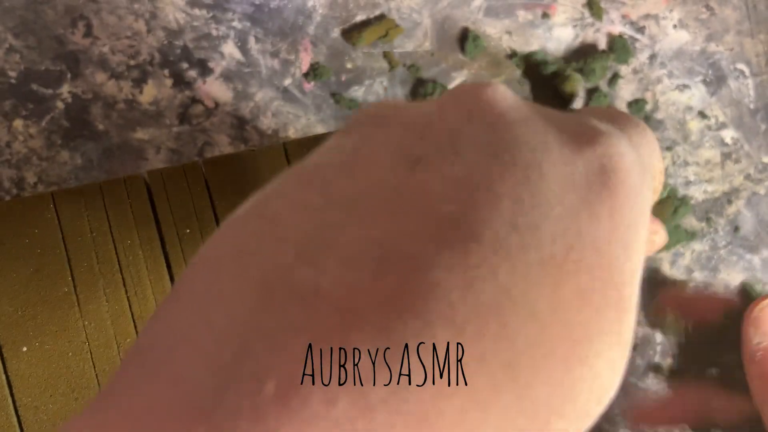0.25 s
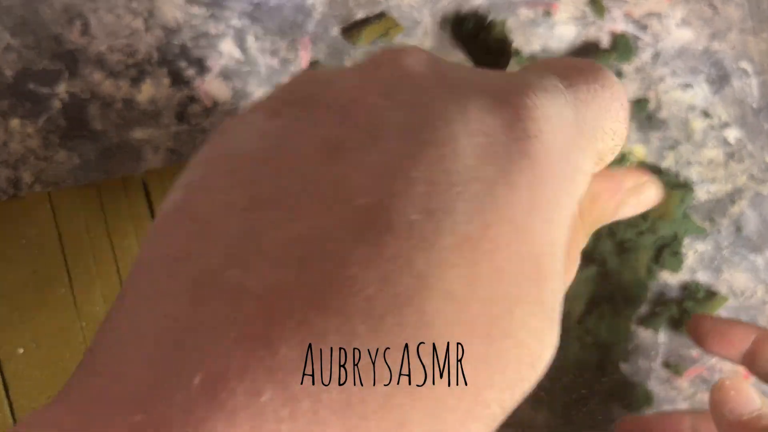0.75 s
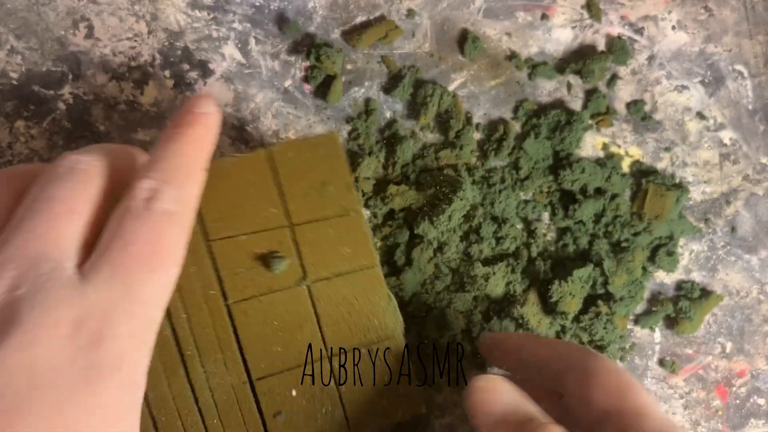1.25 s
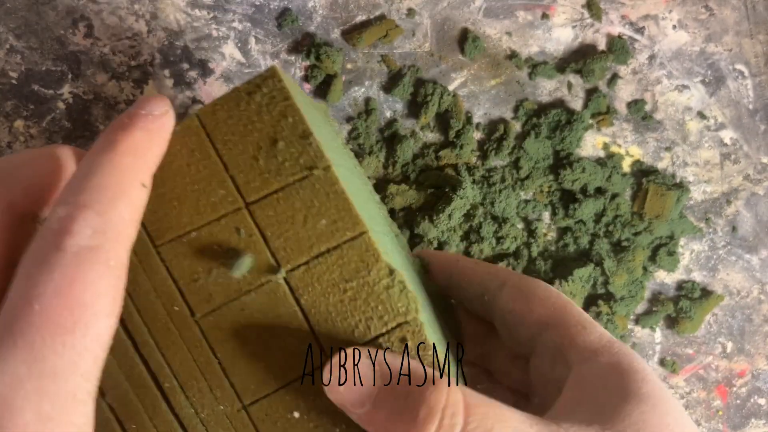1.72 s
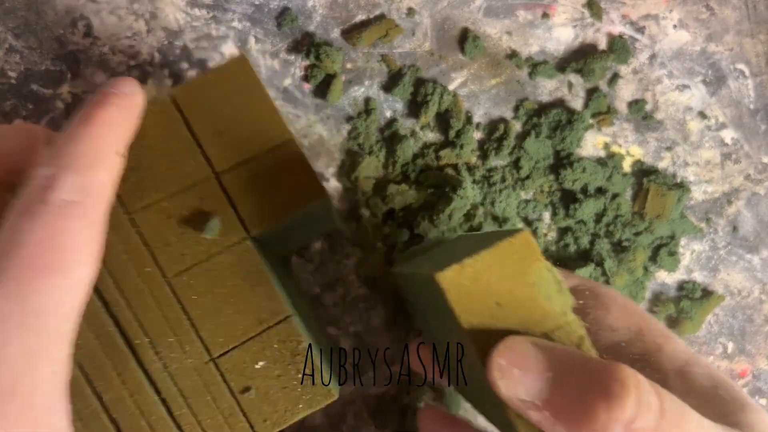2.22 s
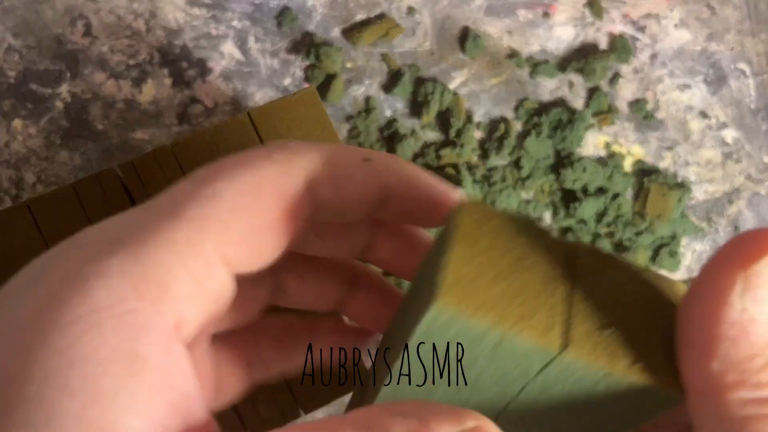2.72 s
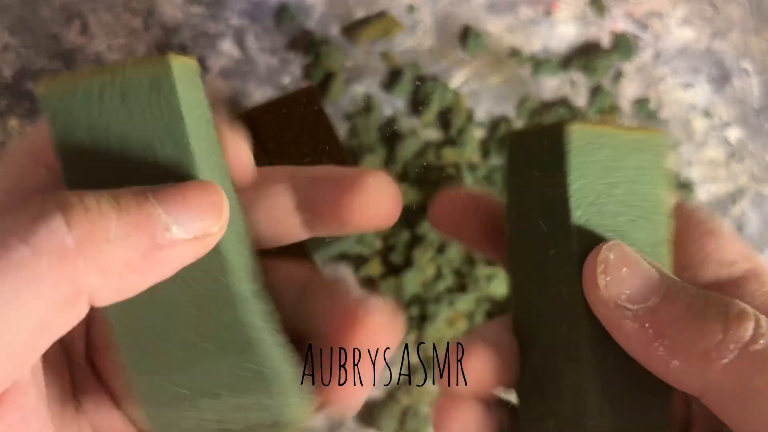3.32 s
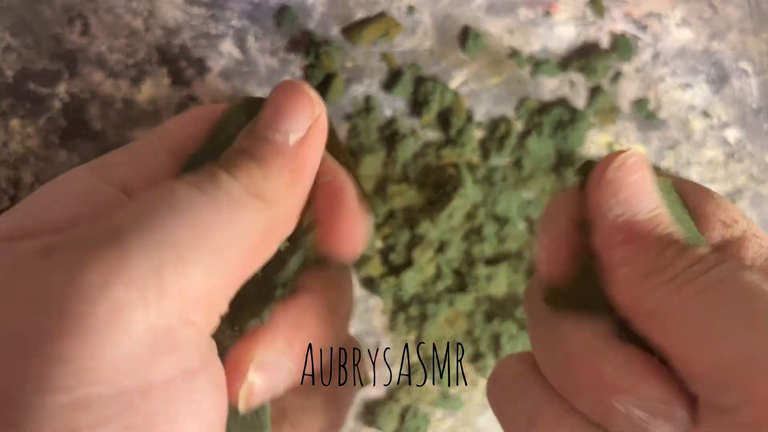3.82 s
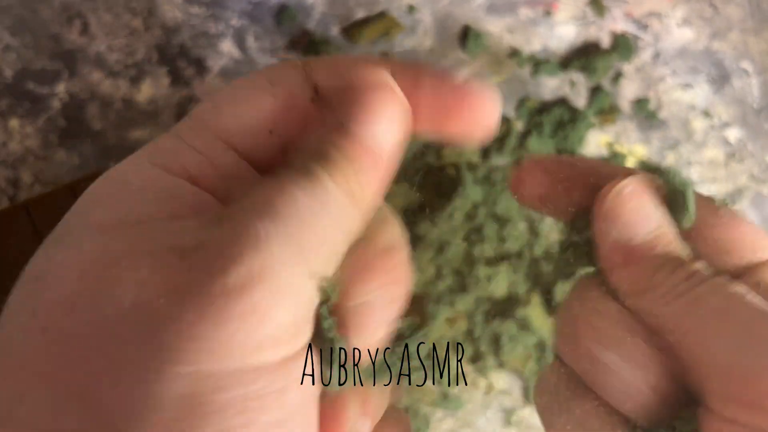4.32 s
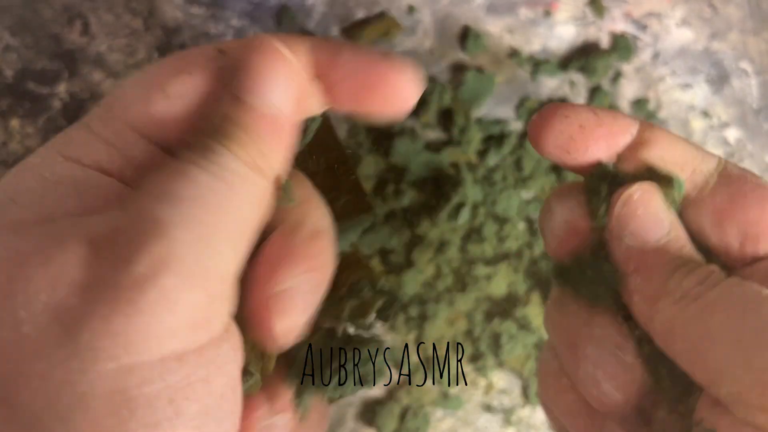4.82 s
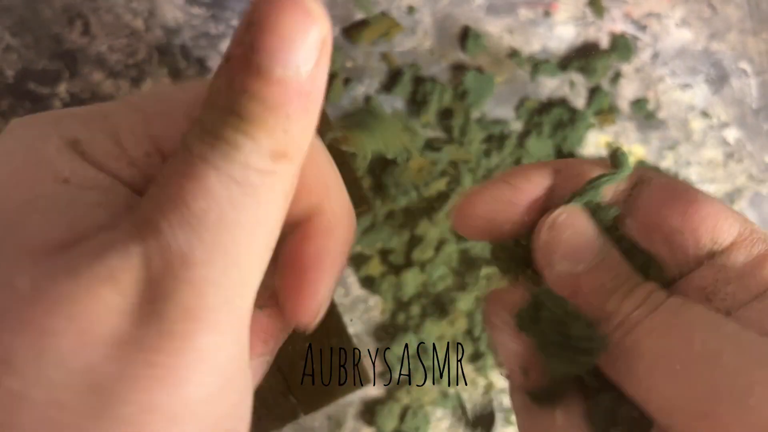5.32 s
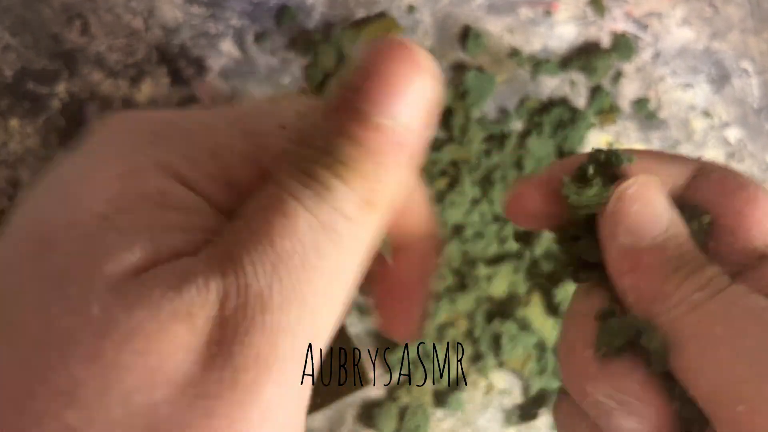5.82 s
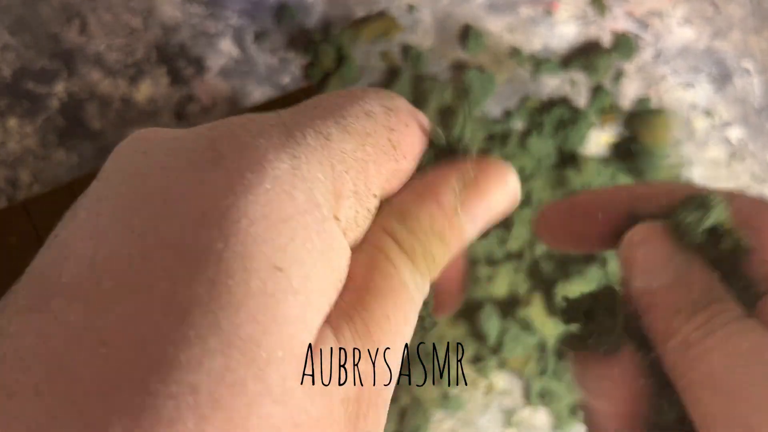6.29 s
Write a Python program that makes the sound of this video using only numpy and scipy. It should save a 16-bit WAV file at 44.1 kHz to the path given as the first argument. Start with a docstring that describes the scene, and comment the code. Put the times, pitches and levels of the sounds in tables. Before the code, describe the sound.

Close up in a quiet room, a palm grinds dry foam crumbs with faint hisses and light taps. Skin scrapes a hollow foam block until a piece cracks off, and the block knocks down on the table. After more rubbing the piece snaps loudly in two, and both halves are crushed in the fists with a bright, dense crunch that softens into small crumbling squeezes.

```python
"""Dry, brittle foam is worked by hand on a table: breaking cells are random clicks shaped by gestures.
A palm grinds crumbs, skin rubs a hollow block, and pressed pieces crunch in a resonant fist.
A piece breaks off, then snaps: bursts of noise with pulses that ring block or piece resonances.
The block drops on the table, whose decaying modes sound; fingers and crumbs tap as narrow noise bands.
Weight on the table rumbles, and a short reverberant tail and faint noise place it in a quiet room."""
import sys
import numpy as np
from scipy import signal
from scipy.fft import rfft, irfft, next_fast_len
from scipy.io import wavfile
from scipy.ndimage import uniform_filter1d, map_coordinates

SR = 44100
rng = np.random.default_rng(int(sys.argv[2]) if len(sys.argv) > 2 else 0)


def materialize(psi):
    """Save the field psi as 16-bit PCM at rate SR to the path in sys.argv[1].

    A 1-D psi becomes a single channel; in a 2-D psi each row is a channel.
    """
    bounded = np.clip(np.atleast_2d(psi).T, -1, 1)
    quanta = np.round(bounded * 32767).astype(np.int16)
    wavfile.write(sys.argv[1], SR, quanta)


N = 288855  # samples

# All levels are relative. Gesture lengths run from the start and include the rise.
# pushes of the palm on crumbs: start_s, rise_s, length_s, grit_db, palm_rasp_db
PUSHES = [(-.02, .027, .19, -48.5, -63), (.175, .038, .245, -54, -62.5), (.44, .06, .08, -53, -61),
          (.537, .017, .146, -60.5, -71), (.654, .065, .117, -55, -70), (.768, .022, .06, -49.5, -66)]
# strokes of skin on the block: start_s, rise_s, length_s, grit_db, held_sag_db, hollow_block_db
STROKES = [(1.204, .02, .045, -49, .5, -46.5), (1.25, .02, .1, -46, 1, -43), (1.35, .01, .06, -52, 7, -52),
           (1.408, .01, .095, -47.5, 3.5, -48), (1.505, .03, .065, -54, 0, -54),
           (1.57, .008, .065, -50, 5, -50), (1.638, .007, .075, -48.5, 0, -50),
           (1.725, .005, .15, -54.5, 7, -60), (1.888, .016, .115, -42.5, 1, -43),
           (2.005, .06, .125, -50, 0, -51), (2.125, .025, .043, -46, 0, -46),
           (2.179, .02, .08, -55, 8, -60), (2.262, .006, .025, -53, 4, -56),
           (2.295, .008, .018, -44.5, 2.5, -51), (2.324, .012, .025, -50, .5, -44),
           (2.358, .012, .055, -43.5, .5, -50), (2.41, .01, .055, -50, 7, -58),
           (2.465, .035, .1, -41.5, 3, -51), (2.565, .02, .06, -49, 3, -60),
           (2.625, .025, .07, -48, 4, -59), (2.699, .006, .016, -39, 3, -50),
           (2.752, .008, .02, -45, 3.5, -56), (2.778, .028, .035, -39.5, 2, -48),
           (2.831, .008, .072, -40, 2, -46), (2.905, .01, .065, -54, 12, -64),
           (2.974, .008, .095, -53, 0, -61), (3.084, .006, .217, -42.5, 13, -48)]
# squeezes of the fists: start_s, rise_s, length_s, grit_db, held_sag_db, pieces_db, rumble_db, closed_fist_hz
SQUEEZES = [(3.311, 0.016, 0.036, -32.0, 1.0, -44.5, -53.0, 550.0),
            (3.352, 0.108, 0.232, -33.0, 1.0, -46.0, -57.0, 600.0),
            (3.566, 0.09, 0.215, -18.5, 7.0, -37.5, -52.0, 700.0),
            (3.81, 0.048, 0.3, -37.0, 5.0, -49.5, -58.0, 650.0),
            (4.087, 0.19, 0.443, -34.5, 9.0, -47.5, -73.0, 1050.0),
            (4.6, 0.19, 0.39, -36.8, 8.0, -47.5, -73.0, 1350.0),
            (5.065, 0.108, 0.38, -41.0, 7.0, -52.5, -74.0, 1050.0),
            (5.462, 0.223, 0.486, -40.0, 10.0, -57.0, -76.0, 1350.0),
            (6.0, 0.04, 0.085, -53.0, 0.0, -68.0, -80.0, 1200.0),
            (6.07, 0.08, 0.3, -42.0, 4.0, -60.0, -80.0, 1500.0),
            (6.425, 0.035, 0.148, -56.0, 0.0, -69.5, -80.0, 900.0)]
# lumps giving way in a fist: start_s, length_s, grit_db, air_pocket_db, pocket_hz
COLLAPSES = [(3.495, .03, -39, -50, 600), (3.607, .03, -35, -50, 550), (3.69, .03, -29, -46, 1200),
             (3.755, .045, -28, -48, 1200), (3.852, .03, -34, -50, 950), (3.998, .035, -46, -48, 1000),
             (4.095, .025, -45, -53, 1200), (4.207, .04, -44, -55, 680), (4.358, .025, -47, -57, 950),
             (4.484, .045, -39, -49, 1100), (4.59, .013, -46, -62, 1200), (4.665, .04, -42, -62, 560),
             (4.708, .03, -47, -57, 1300), (4.872, .035, -47, -53, 1200), (4.975, .03, -48, -59, 1400),
             (5.13, .05, -41, -59, 950), (5.215, .045, -39, -52, 2200), (5.396, .022, -51, -59, 1200),
             (5.52, .035, -58, -66, 450), (6.115, .035, -44, -69, 1200), (6.296, .025, -50, -73, 1100)]
# light taps of fingers and crumbs: start_s, thump_db, pitch_hz, t60_s, click_db
TAPS = [(.1215, -42, 220, .1, -56), (.222, -50, 290, .025, -47), (.229, -50, 220, .035, -57),
        (.284, -58, 230, .06, -66), (.934, -50, 210, .12, -68), (.979, -42, 250, .03, -57),
        (.999, -42, 440, .025, -55), (1.008, -48, 200, .1, -62), (1.031, -47, 300, .08, -62),
        (1.053, -49, 220, .09, -64), (3.305, -49, 650, .025, -52), (4.112, -40, 250, .06, -43),
        (4.556, -45, 400, .03, -48), (4.565, -49, 210, .06, -62), (4.992, -52, 330, .04, -56),
        (6.108, -52, 300, .06, -57), (6.415, -49, 260, .08, -63)]
# cracks, lone or in a quick run of jerks: start_s, level_db, t60_s, edge_db, ring_db (last two re level_db)
CRACKS = [(.822, -50, .07, -2, -25), (1.414, -46, .06, -2, -3), (1.647, -36, .025, -3, -6),
          (1.701, -39, .02, -3, -6), (1.8843, -41, .2, -2, -10.5), (1.9052, -25, .014, -1, -1),
          (1.9132, -24.5, .022, -2, -1), (1.9234, -22, .018, -2, 0), (1.9295, -31, .02, -1, 0),
          (1.9416, -12, .008, -8.5, -1), (1.9428, -17, .008, -4, 1), (1.9444, -20, .012, -3, 2),
          (1.948, -27, .046, -2, 2), (1.965, -34, .015, -2, 0), (1.981, -36, .012, -2, 4),
          (2.504, -35, .02, -2, -8), (2.757, -41, .03, -2, -12), (2.808, -37, .025, -2, -10),
          (2.839, -37, .03, -1, -12), (3.0663, -17.5, .018, 1, -8), (3.0695, -17, .018, -4, -5),
          (3.0728, -14, .016, -2, -5), (3.0755, -12.5, .012, -2, -4), (3.0776, -7.5, .016, -7, -3),
          (3.214, -31.5, .09, -2, -14), (3.652, -21, .004, -2, -26), (3.707, -18, .006, -2, -25),
          (3.867, -30, .015, -2, -20), (4.012, -33, .015, -2, -8), (4.795, -37, .012, -2, -25),
          (4.879, -38, .02, -2, -12)]
# blows on the table: start_s, peak_db, contact_hardness_hz, share of the free ringing time
KNOCKS = [(1.228, -37, 50, .9), (1.572, -44, 60, .8), (1.726, -38, 65, .6), (1.787, -36, 62, .8),
          (1.943, -27, 810, .8), (1.996, -40, 200, .8), (2.268, -39, 80, 1), (2.298, -38, 75, 1),
          (2.359, -28, 1300, .5), (2.3664, -17.5, 700, .5), (2.38, -25, 1400, .4), (2.383, -12, 1100, .75),
          (2.39, -24, 85, .9), (2.401, -25, 300, .8), (2.41, -26, 420, .9), (2.421, -35, 900, .8),
          (2.782, -42, 91, 1), (3.079, -36, 150, .8), (3.319, -41, 163, .8), (4.565, -51, 130, .7),
          (5.002, -49, 95, .8), (5.45, -49, 105, .6)]
# modes of the table top, before each blow's scatter and damping: pitch_hz, level_db, free_t60_s
TABLE_MODES = [(55, -11, .14), (72, -8, .13), (118, -8, .1), (185, -1, .13), (240, -3.5, .15),
               (342, 0, .14), (455, -2, .07), (581, -3, .05), (782, 1, .055), (965, 1, .055),
               (1150, -5, .04)]
# hollow resonances of the large block, then of the piece broken off: pitch_hz, width_hz, level_db
BLOCK_MODES = [(370, 200, -6), (589, 130, -9), (920, 240, -1), (1240, 140, -5), (1770, 190, -2.5),
               (2300, 300, -9), (2750, 300, -9), (3500, 550, -17)]
PIECE_MODES = [(360, 120, -17), (780, 150, -12), (1270, 240, -4), (1940, 220, -4), (3030, 350, -2),
               (3950, 500, -2)]
# power spectra, later scaled to unit gain: frequency_hz, level_db (per Hz)
GRIND_SPECTRUM = [(200, -22), (900, -24.5), (1400, -9), (2100, -7.5), (2450, -1.5), (3000, -4),
                  (4200, -1.5), (5600, -4), (7500, -1.5), (10000, 0), (12500, -6.5), (15000, -16.5),
                  (16000, -26)]  # crumbs under the palm
SKIN_SPECTRUM = [(300, -22.5), (1200, -16), (2100, -3.5), (2550, 1), (3300, -1.5), (4100, 0), (5400, -6),
                 (7500, -4.5), (10000, -5.5), (12000, -12), (14500, -23.5), (16000, -39.5)]  # skin on open cells
CELL_SPECTRUM = [(300, -39), (1100, -25), (1700, -9.5), (2350, -1.5), (3100, -0.5), (4000, -1), (5200, -3),
                 (7000, -0.5), (9000, 2), (11000, -2), (13000, -8.5), (15000, -18)]  # small cells collapsing
LUMP_SPECTRUM = [(200, -14), (600, -8), (1100, -2.5), (1500, -3), (1850, 1), (3000, -4), (6000, -22),
                 (12000, -45.5)]  # larger pieces
SNAP_SPECTRUM = [(100, -22), (450, -16.5), (900, -11.5), (1450, -4), (1950, -3), (2400, -1), (3050, 2.5),
                 (4200, -4), (5600, -10.5), (9000, -17), (15000, -36)]  # body of a crack
EDGE_SPECTRUM = [(500, -32), (2500, -7), (6000, -4), (9200, 2), (12000, -8.5), (15000, -22.5)]  # sharp edge of a crack
CLICK_SPECTRUM = [(100, -8), (500, 0), (1000, -1), (2000, -20), (3500, -40), (12000, -42)]  # contact of a tap
RUMBLE_SPECTRUM = [(20, -35), (45, -9), (70, 1.5), (120, -1), (200, -3.5), (400, -5), (700, -10),
                   (1000, -25), (1800, -50)]  # hands bearing on foam and table
ROOM_NOISE_SPECTRUM = [(20, -14), (60, 2.5), (130, -1), (300, -8), (700, -12), (1800, -16.5), (3000, -25),
                       (4400, -20), (5000, -14.5), (6000, -23.5), (15000, -29.5)]
# the two ports: frequency_hz, left_lead_rad
PORT_PHASE = [(20, 0), (500, .1), (1200, .5), (1560, 2), (1750, 0), (1950, 0), (2900, .8), (4000, .4),
              (5000, .3), (5500, -.9), (6400, -1.1), (8200, -3.1), (8700, -3.2), (11400, -6.2),
              (12900, -6.3), (14700, -9.4)]
# the two ports: frequency_hz, left_over_right_db
PORT_TILT = [(100, 0.5), (1100, 3), (1700, 0.5), (2800, 3), (4000, 3.5), (5500, 1), (7000, 2.5),
             (8300, -0.5)]
# stereo width: frequency_hz, unshared_over_shared_db
SPREAD = [(60, -14.5), (600, -8.5), (1350, -2), (1850, -11), (2800, -8.5), (5500, -8), (7500, -11.5),
          (8400, -25), (10000, -12), (12000, -19.5), (14000, -11)]
# reverberation of the room: frequency_hz, t60_s
ROOM_DECAY = [(100, 0.312), (260, .27), (700, 0.235), (1840, 0.194), (4850, 0.174), (12000, 0.099)]
# echoes from hands and table top, delays before drift: delay_s, level_db
NEARBY_ECHOES = [(.0011, -18), (.0027, -16), (.0052, -15.5), (.0093, -17.5)]

# times to fall 60 dB once a gesture ends
PUSH_RELEASE_S, STROKE_RELEASE_S, SQUEEZE_RELEASE_S, COLLAPSE_RELEASE_S = .19, .11, .4, .14
PUSH_SAG_DB, COLLAPSE_RISE_S = 1, .012
# half-widths of resonant bands, in natural-log units each side
PALM_WIDTH, TAP_WIDTH, POCKET_WIDTH = .07, .3, .36
PALM_HZ = 2460  # resonance of the cupped palm
TAP_CLICK_T60_S = .02
OPEN_FIST_HZ, CLOSING_POWER = 520, 1.2
FIST_DAMPING, FIST_LEAK = .9, .14  # relative width of resonance; gain escaping between the fingers
PICKUP_S = 2.45  # from here on the hands hold the piece
GRIP_DRIFT, GRIP_RATE = .025, 14  # typical share of retuning by the grip; changes a second
HAND_DRIFT, HAND_RATE = .15, 4  # typical share of echo path change; changes a second
# rumble of resting hands; of a stroke over its hollow ring; of a stroke over its grit
RESTING_DB, BLOCK_RUMBLE_DB, SKIN_RUMBLE_DB = -78, -6, -13
TOP_HZ = 15800  # upper band limit


def amp(db):
    """Level law: decibels to amplitude gain."""
    return 10 ** (np.asarray(db) / 20)


def unit(x):
    """Power normalisation: scale to rms 1."""
    return x / np.sqrt(np.mean(x ** 2) + 1e-20)


def along(points, hz):
    """Logarithmic frequency scale: interpolate (Hz, value) points."""
    f, v = np.transpose(points)
    return np.interp(np.log(hz + 1), np.log(f + 1), v)


def wobble(rate):
    """Slow random modulation: a smooth curve through normal random knots, rate a second."""
    knots = rng.standard_normal(int(N * rate / SR) + 4)
    steps = np.arange(0, len(knots) - 1, 1 / 10)
    smooth = map_coordinates(knots, [steps])
    return np.interp(np.arange(N) * (rate / SR), steps, smooth)


def filtered(x, response):
    """Linear filtering: multiply the spectrum by a complex response of frequency."""
    m = 2 * next_fast_len(N // 2 + 8192)
    return irfft(rfft(x, m) * response(np.fft.rfftfreq(m, 1 / SR)), m)[..., :N]


def colour(x, spectrum):
    """Minimum-phase filtering: a causal filter of unit power gain with the given spectrum."""
    hz = np.fft.rfftfreq(8192, 1 / SR)
    cepstrum = irfft(np.log(unit(amp(along(spectrum, hz)))))
    # folding the cepstrum onto positive time makes the filter causal
    cepstrum[1:len(hz) - 1] *= 2
    cepstrum[len(hz):] = 0
    impulse = irfft(np.exp(rfft(cepstrum)))
    return signal.oaconvolve(np.atleast_2d(x), impulse[None], axes=1)[:, :N]


def shifting(x, gain):
    """Time-varying filtering: apply gain(Hz column, s row) to short-time spectra."""
    hz, s, z = signal.stft(x, SR, nperseg=1024)
    return signal.istft(z * gain(hz[:, None], s), SR, nperseg=1024)[1][..., :N]


def band(hz, width):
    """Band-pass resonance: filter sections around hz, width in natural-log units each side."""
    return signal.butter(2, hz * np.exp([-width, width]), "bandpass", fs=SR, output="sos")


def resonate(modes, f):
    """Modal superposition: response of a body as damped resonances of alternating sign."""
    response = 0
    for k, (hz, w, db) in enumerate(modes):
        response = response + (-1) ** k * amp(db) * 1j * f * w / (hz * hz - f * f + 1j * f * w)
    return response


def widen(pair):
    """Partial coherence: a shared and an unshared signal become left and right."""
    shared = pair[0]
    apart = filtered(pair[1], lambda hz: amp(along(SPREAD, hz)))
    return np.array([shared + apart, shared - apart])


def grains(rate, scatter_db, clump_db, clump_rate):
    """Random impulse process: breaking cell walls click, uneven in size, in small avalanches."""
    clicks = (rng.random((2, N)) < rate / SR) * rng.choice([-1, 1], (2, N))
    sizes = amp(scatter_db * np.clip(rng.standard_normal((2, N)), -3, 3))
    avalanches = amp(clump_db * wobble(clump_rate))
    return unit(widen(clicks * sizes * avalanches))


def add(track, s, sound):
    """Superposition: mix a sound in at time s."""
    part = track[..., round(s * SR):][..., :sound.shape[-1]]
    part += sound[..., :part.shape[-1]]


def effort(s, rise, length, sag_db, release):
    """Amplitude envelope: pressure builds from s, sags while held, then falls 60 dB per release time."""
    pressure = np.zeros(N)
    n = np.arange(max(int(s * SR), 0), min(int((s + length + 1.5 * release) * SR), N))
    t = n / SR - s
    held = np.clip((t - rise) / max(length - rise, 1 / SR), 0, 1)
    fall_db = 60 * np.maximum(t - length, 0) / release
    pressure[n] = np.clip(t / rise, 0, 1) * amp(-sag_db * held - fall_db)
    return pressure


def combined(efforts, levels_db):
    """Incoherent addition: overlapping gestures, each at its own level, add in power."""
    return np.sqrt(sum((amp(db) * pressure) ** 2 for pressure, db in zip(efforts, levels_db)))


def grinding():
    """Granular friction: crumbs hiss under each push of the palm and rasp in its resonant hollow."""
    starts, rises, lengths, grit_db, rasp_db = np.transpose(PUSHES)
    pushes = [effort(*shape, PUSH_SAG_DB, PUSH_RELEASE_S) for shape in zip(starts, rises, lengths)]
    fine = grains(rate=12000, scatter_db=3.0, clump_db=1.5, clump_rate=220)
    hiss = colour(fine, GRIND_SPECTRUM)
    coarse = grains(rate=900, scatter_db=3, clump_db=2, clump_rate=90)
    rasp = unit(signal.sosfilt(band(PALM_HZ, PALM_WIDTH), coarse))
    return combined(pushes, grit_db) * hiss + combined(pushes, rasp_db) * rasp


def fingers(hz, s):
    """Changing apertures: gaps between moving fingers favour ever different narrow bands."""
    field = rng.standard_normal((len(hz), len(s)))
    field = uniform_filter1d(field, size=7, axis=0)
    field = uniform_filter1d(field, size=7, axis=1)
    return unit(amp(1.8 * unit(field)))


def reflected(x):
    """Comb filtering: close echoes, whose paths lengthen and shorten as the hands move."""
    n, echoes = np.arange(N), 0
    for delay_s, db in NEARBY_ECHOES:
        source = n - delay_s * SR * (1 + HAND_DRIFT * wobble(HAND_RATE))
        echoes = echoes + amp(db) * np.array([np.interp(source, n, port) for port in x])
    return x + echoes


def rumble(weight):
    """Low-frequency contact noise: hands bear unevenly on foam and table."""
    jolts = grains(rate=1400, scatter_db=4, clump_db=2.5, clump_rate=25)
    return weight * colour(jolts, RUMBLE_SPECTRUM)


def tapping():
    """Light impact: a thin click of contact and a brief, dull, hollow thump."""
    thumps, clicks = np.zeros((2, N))
    t = np.arange(SR // 5) / SR
    for s, db, hz, t60, click_db in TAPS:
        burst = rng.standard_normal(len(t)) * amp(-60 * t / t60)
        thump = signal.sosfilt(band(hz, TAP_WIDTH), burst)
        add(thumps, s, amp(db) * thump / np.abs(thump).max())
        click = amp(click_db - 60 * t / TAP_CLICK_T60_S) * rng.standard_normal(len(t))
        add(clicks, s, click)
    return amp(-2) * thumps + amp(-3) * colour(clicks, CLICK_SPECTRUM)


def snapping():
    """Brittle fracture: a sharp release rings block or piece, with a dying burst of breaking cells."""
    body, edge, block_pulses, piece_pulses = np.zeros((4, 2, N))
    t = np.arange(SR // 10) / SR
    release = np.outer([1, 0], t == 0)  # one-sample pulse, shared by both ports
    for s, db, t60, edge_db, ring_db in CRACKS:
        bursts = rng.standard_normal((2, 2, len(t))) * amp(db - 60 * t / t60)
        add(body, s, bursts[0] - amp(db + 10) * release)
        add(edge, s, amp(edge_db) * bursts[1])
        pulses = block_pulses if s < PICKUP_S else piece_pulses
        add(pulses, s, amp(db + ring_db + 34.5) * release)  # 34.5 dB lifts a lone pulse
    block_ring = filtered(block_pulses, lambda f: resonate(BLOCK_MODES, f))
    piece_ring = filtered(piece_pulses, lambda f: resonate(PIECE_MODES, f))
    noise = colour(body, SNAP_SPECTRUM) + colour(edge, EDGE_SPECTRUM)
    return amp(-3) * widen(noise + block_ring + piece_ring)


def gripped(hz, s):
    """Resonance detuning: modes of the block, later the piece, slide as fingers move over it."""
    tuning = 1 + GRIP_DRIFT * np.interp(s * SR, np.arange(N), wobble(GRIP_RATE))

    def retuned(modes):
        """Frequency scaling: stretch the resonance curve by the tuning."""
        return np.interp(hz / tuning, hz[:, 0], unit(np.abs(resonate(modes, hz[:, 0]))))

    return np.where(s < PICKUP_S, retuned(BLOCK_MODES), retuned(PIECE_MODES))


def rubbing():
    """Stick-slip friction: skin catches on open cells, the block rings; gives sound and table weight."""
    starts, rises, lengths, grit_db, sags_db, hollow_db = np.transpose(STROKES)
    shapes = zip(starts, rises, lengths, sags_db)
    strokes = [effort(*shape, STROKE_RELEASE_S) for shape in shapes]
    grit, hollow = combined(strokes, grit_db), combined(strokes, hollow_db)
    catches = grains(rate=350, scatter_db=2.5, clump_db=2, clump_rate=40)
    fine = grains(rate=13000, scatter_db=3.3, clump_db=1.4, clump_rate=140)
    scrape = colour(amp(-8) * catches + amp(-.7) * fine, SKIN_SPECTRUM)
    excitation = grains(rate=2200, scatter_db=3.5, clump_db=2, clump_rate=130)
    body = unit(shifting(excitation, gripped))
    weight = np.hypot(amp(BLOCK_RUMBLE_DB) * hollow, amp(SKIN_RUMBLE_DB) * grit)
    return grit * scrape + hollow * body, weight


def knocking():
    """Struck modes: a soft contact wakes only the table's low modes; one that stays down damps them."""
    track, t = np.zeros(N), np.arange(SR // 3) / SR
    hz, level, t60 = np.transpose(TABLE_MODES)[:, :, None]
    for s, db, hard_hz, free in KNOCKS:
        uneven = amp(level + 1.5 * rng.standard_normal(hz.shape))
        strength = uneven / np.sqrt(1 + (hz / hard_hz) ** 6)
        pitch = hz * (1 + .03 * rng.standard_normal(hz.shape))
        sign = rng.choice([-1, 1], hz.shape)
        decay = amp(-60 * t / (free * t60))
        ring = np.sum(strength * sign * decay * np.sin(2 * np.pi * pitch * t), axis=0)
        ring *= 1 - np.exp(-2 * np.pi * hard_hz * t)  # softer contacts start more slowly
        add(track, s, amp(db) * ring / np.abs(ring).max())
    return track


def fist(hz, s):
    """Cavity resonance: pitch rises as each squeeze closes the hand; little gets out below it."""
    starts, rises, *_, closed_hz = np.transpose(SQUEEZES)
    k = np.maximum(np.searchsorted(starts, s) - 1, 0)  # the latest squeeze
    closure = np.clip((s - starts[k]) / rises[k], 0, 1) ** CLOSING_POWER
    r = hz / (OPEN_FIST_HZ + closure * (closed_hz[k] - OPEN_FIST_HZ))
    through = np.abs(r ** 2 / (1 - r ** 2 + 1j * FIST_DAMPING * r)) ** 2
    return np.hypot(FIST_LEAK, through)


def collapsing():
    """Sudden collapse: a lump gives a spurt of coarse grit, and the air pocket it leaves rings."""
    crumbs = grains(rate=3000, scatter_db=3.5, clump_db=1.5, clump_rate=120)
    spurts = [effort(s, COLLAPSE_RISE_S, length, 0, COLLAPSE_RELEASE_S) for s, length, *_ in COLLAPSES]
    grit = grains(rate=7000, scatter_db=3.2, clump_db=1.5, clump_rate=200)
    sound = combined(spurts, [row[2] for row in COLLAPSES]) * colour(grit, CELL_SPECTRUM)
    for spurt, (*_, db, hz) in zip(spurts, COLLAPSES):
        live = np.flatnonzero(spurt)
        pocket = unit(signal.sosfilt(band(hz, POCKET_WIDTH), crumbs[:, live]))
        sound[:, live] += amp(db) * spurt[live] * pocket
    return sound


def crushing():
    """Crushing in spurts: cells collapse, pieces crunch, walls tick; gives sound and the hands' weight."""
    starts, rises, lengths, grit_db, sags_db, pieces_db, rumble_db, _ = np.transpose(SQUEEZES)
    shapes = zip(starts, rises, lengths, sags_db)
    squeezes = [effort(*shape, SQUEEZE_RELEASE_S) for shape in shapes]
    grit, pieces = combined(squeezes, grit_db), combined(squeezes, pieces_db)
    spurts = amp(.9 * wobble(60))
    fine = grains(rate=20000, scatter_db=3.5, clump_db=1.2, clump_rate=200)
    ticks = grains(rate=300, scatter_db=2.5, clump_db=2, clump_rate=30)
    cells = colour(amp(-.5) * fine + amp(-9) * ticks, CELL_SPECTRUM)
    coarse = grains(rate=5000, scatter_db=3.5, clump_db=1.5, clump_rate=80)
    lumps = shifting(colour(coarse, LUMP_SPECTRUM), fist)
    crunch = grit * cells + amp(-1.8) * pieces * lumps
    return spurts * crunch + collapsing(), combined(squeezes, rumble_db)


def room(x):
    """Reverberation: a short decaying noise tail, different at each port, whose treble dies first."""
    hz, t, z = signal.stft(rng.standard_normal((2, SR // 2)), SR, nperseg=256)
    decay = amp(-60 * t / along(ROOM_DECAY, hz)[:, None])
    tail = signal.istft(z * decay, SR, nperseg=256)[1]
    tail = np.pad(tail / np.linalg.norm(tail[0]), ((0, 0), (SR // 250, 0)))  # starts 4 ms late
    return widen(signal.fftconvolve(x, tail, axes=1)[:, :N])


def scene():
    """Direct and reverberant field: foam a little to the left, rippled by echoes, over faint room noise."""
    (rub, rub_weight), (crush, crush_weight) = rubbing(), crushing()
    foam = reflected(shifting(grinding() + rub + crush, fingers))
    weight = amp(RESTING_DB) + rub_weight + crush_weight
    table = knocking() + tapping() + rumble(weight)
    near = foam + snapping() + table
    direct = filtered(near, lambda hz: amp(np.outer([.5, -.5], along(PORT_TILT, hz))))
    # the wide table top radiates into the room more than the small pieces do
    to_room = (near + amp(4.5) * table).mean(axis=0, keepdims=True)
    tail = amp(-18.5) * room(to_room)
    noise = widen(rng.standard_normal((2, N)))
    floor = amp(-73.5) * colour(noise, ROOM_NOISE_SPECTRUM)
    return direct + tail + floor


def record(dry):
    """Interaural-style phase and band limits: treble leads at right, deep bass is cut, peaks rounded."""
    def ports(hz):
        """Phase difference: half the lead at each port, in opposite senses."""
        return np.exp(1j * np.outer([.5, -.5], along(PORT_PHASE, hz)))

    def low_cut(hz):
        """High-pass response: two second-order sections at 40 Hz."""
        return (hz ** 2 / (40 ** 2 - hz ** 2 + 48j * hz)) ** 2

    x = filtered(dry, lambda hz: ports(hz) * low_cut(hz))
    x = x / (1 + (x / .8) ** 6) ** (1 / 6)  # peaks round off towards 0.8
    return filtered(x, lambda hz: hz < TOP_HZ)


dry = scene()
out = record(dry)
materialize(out)
```